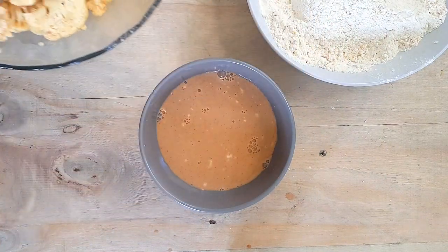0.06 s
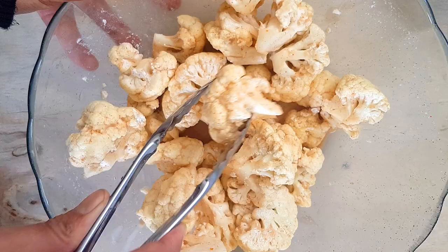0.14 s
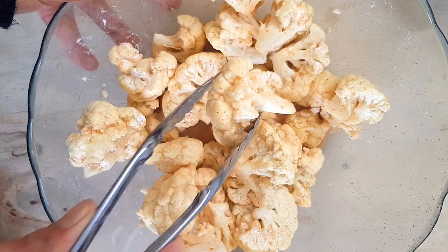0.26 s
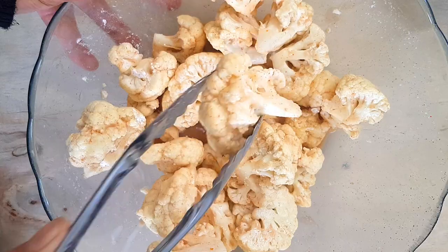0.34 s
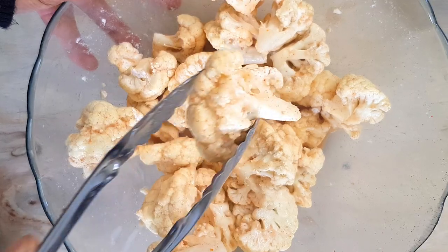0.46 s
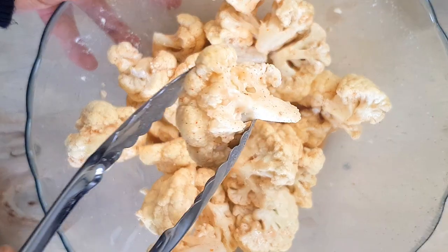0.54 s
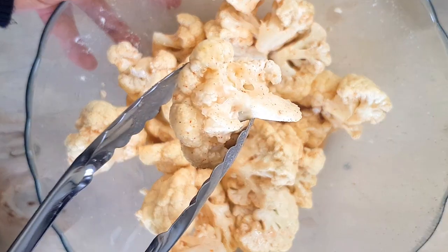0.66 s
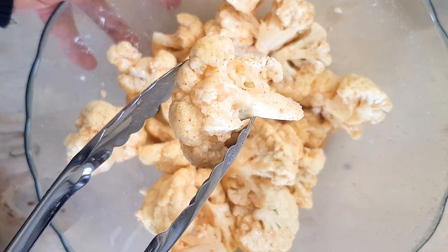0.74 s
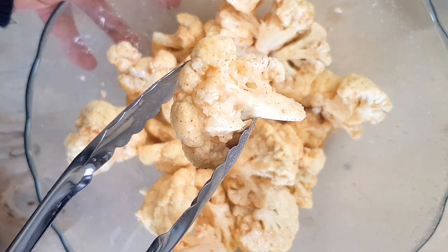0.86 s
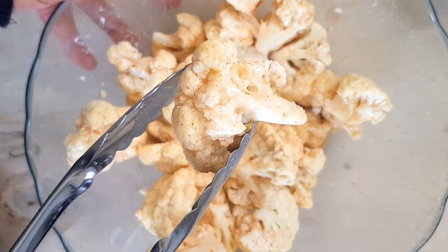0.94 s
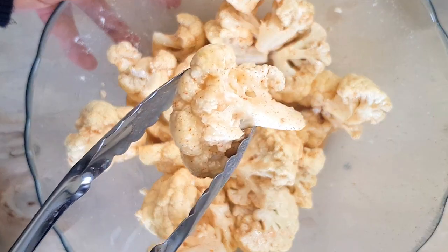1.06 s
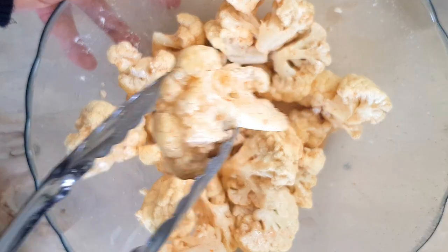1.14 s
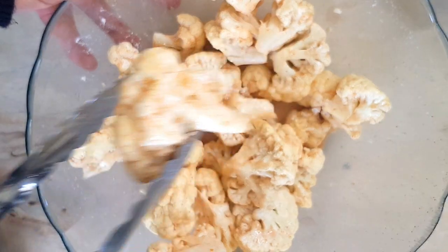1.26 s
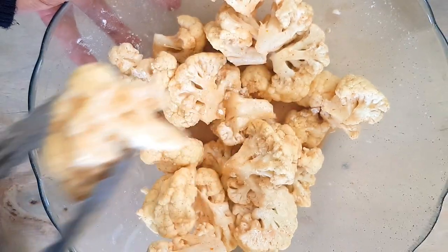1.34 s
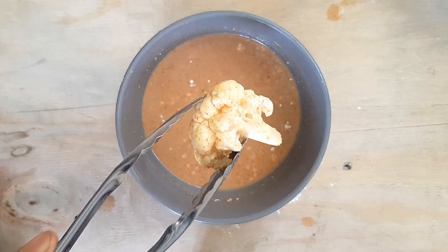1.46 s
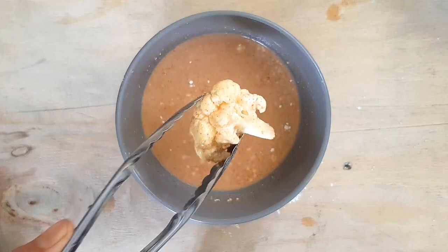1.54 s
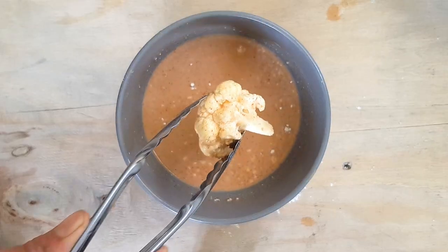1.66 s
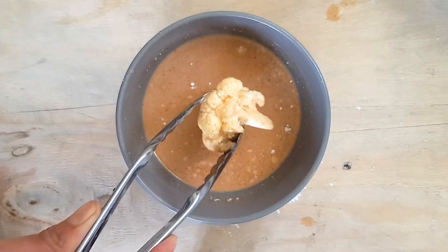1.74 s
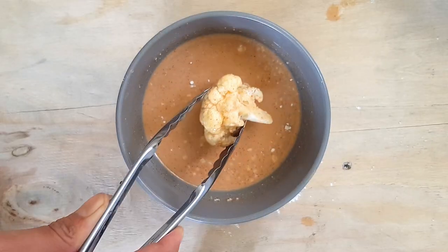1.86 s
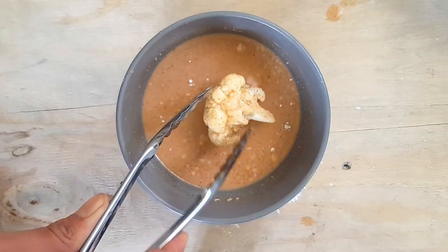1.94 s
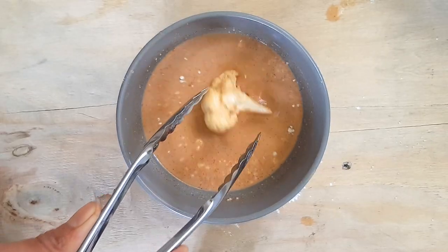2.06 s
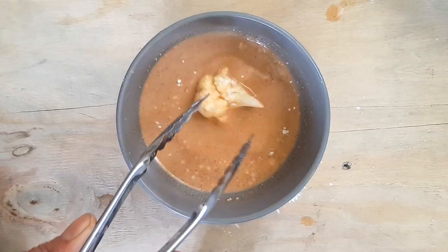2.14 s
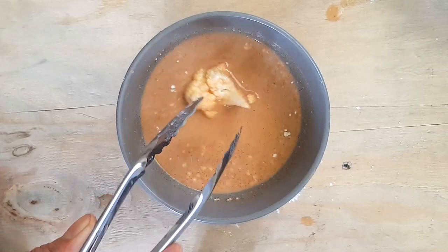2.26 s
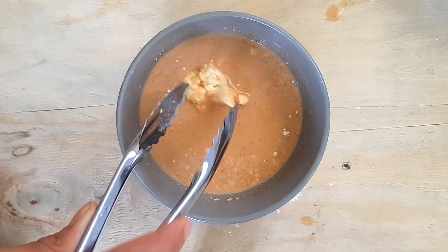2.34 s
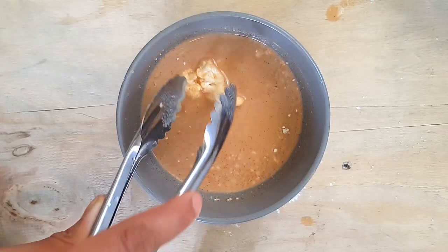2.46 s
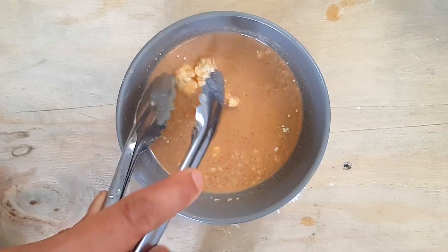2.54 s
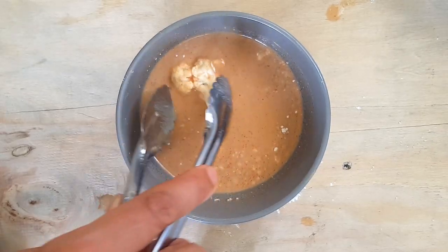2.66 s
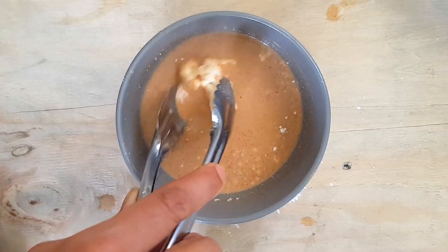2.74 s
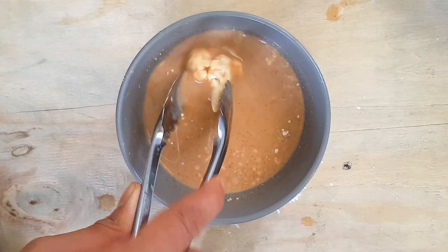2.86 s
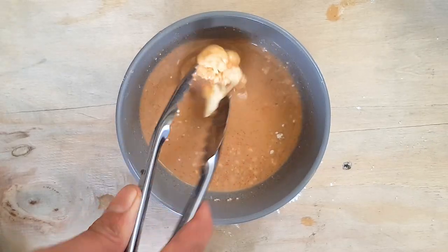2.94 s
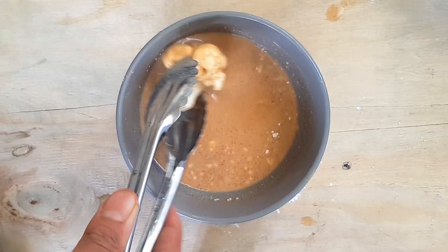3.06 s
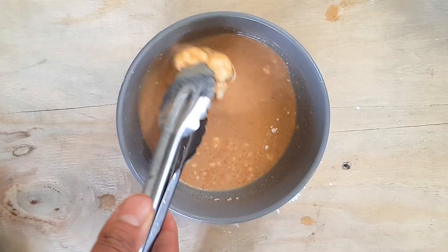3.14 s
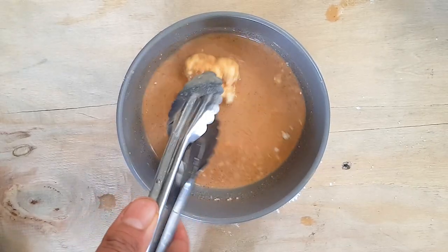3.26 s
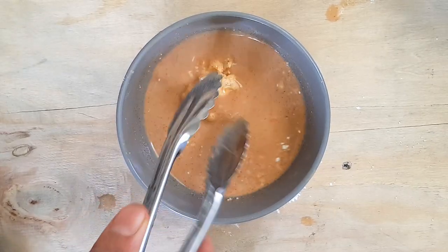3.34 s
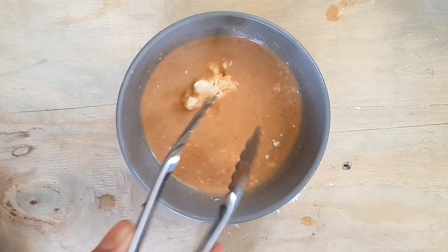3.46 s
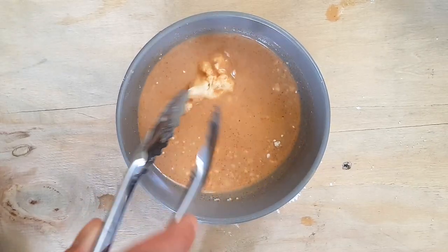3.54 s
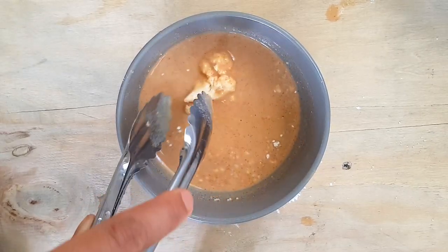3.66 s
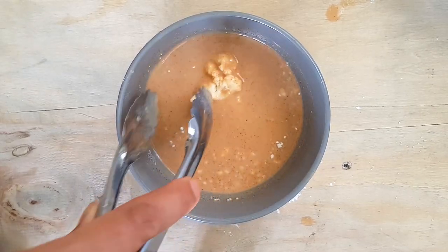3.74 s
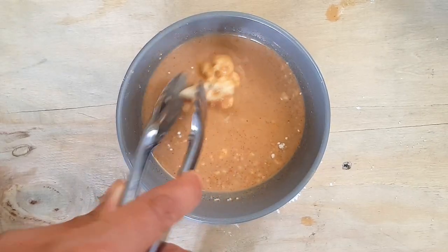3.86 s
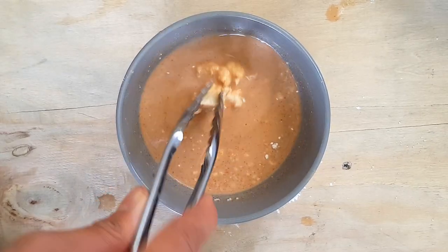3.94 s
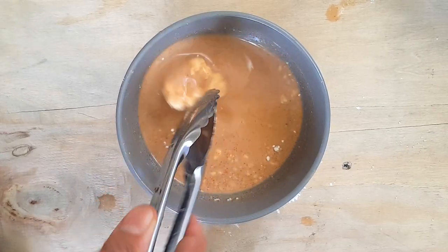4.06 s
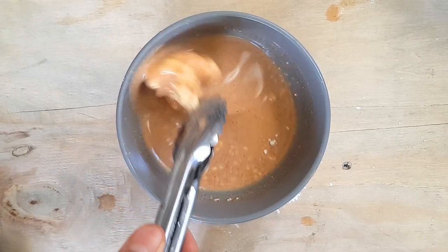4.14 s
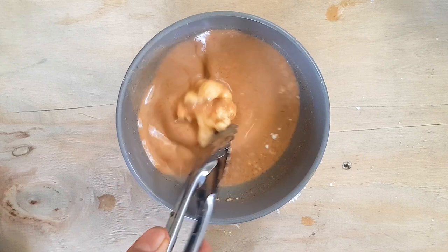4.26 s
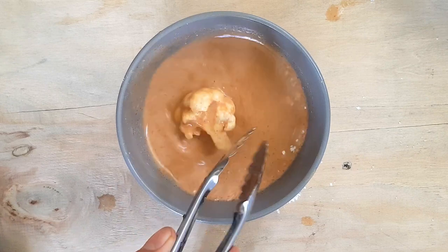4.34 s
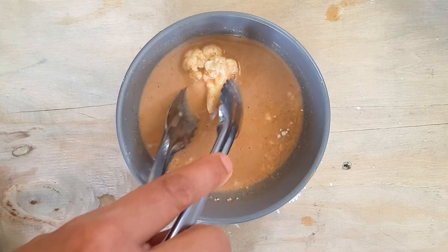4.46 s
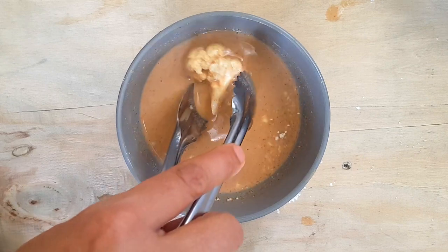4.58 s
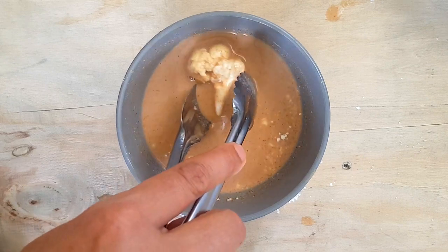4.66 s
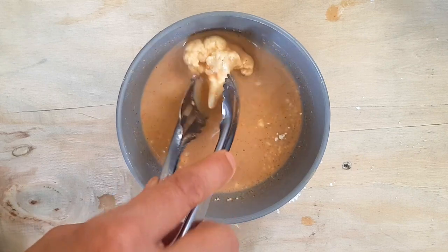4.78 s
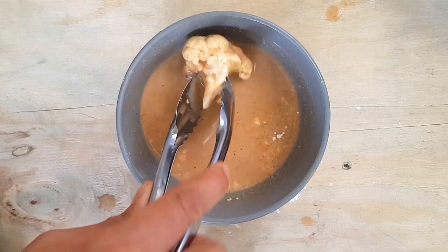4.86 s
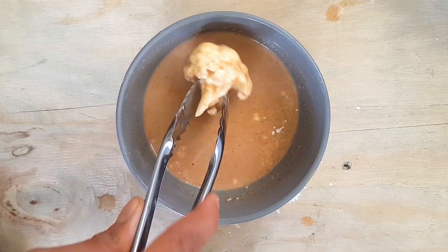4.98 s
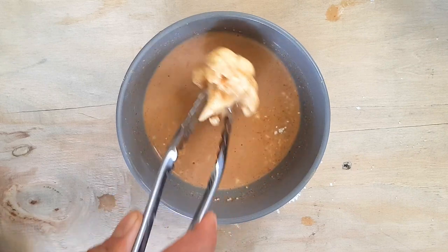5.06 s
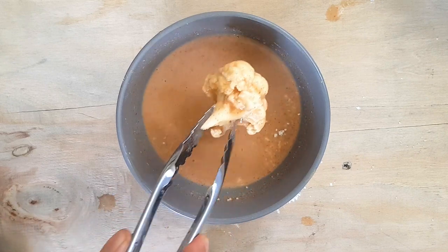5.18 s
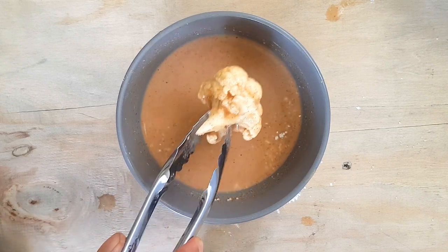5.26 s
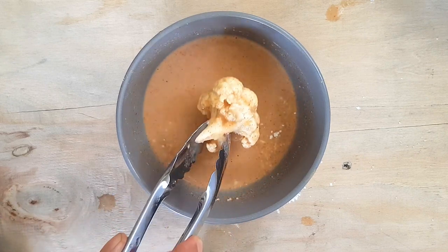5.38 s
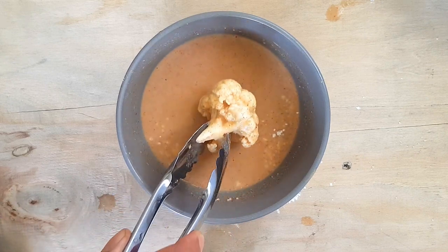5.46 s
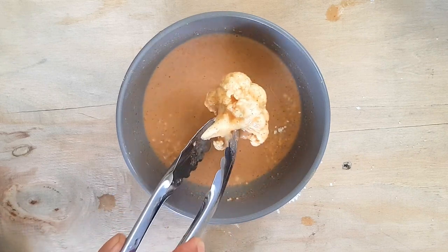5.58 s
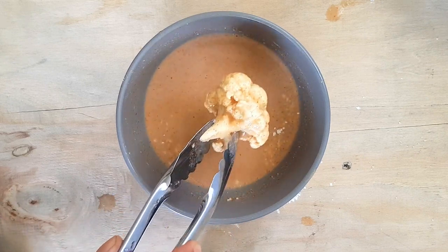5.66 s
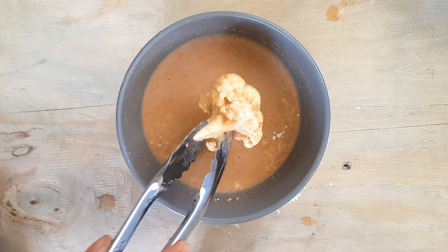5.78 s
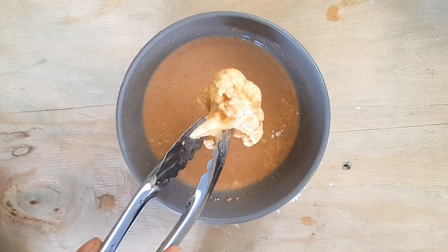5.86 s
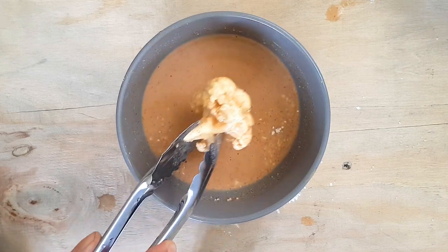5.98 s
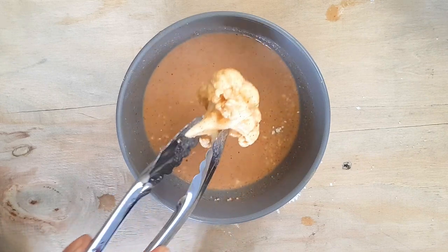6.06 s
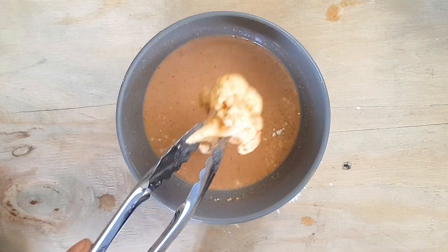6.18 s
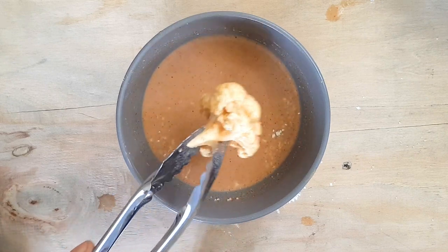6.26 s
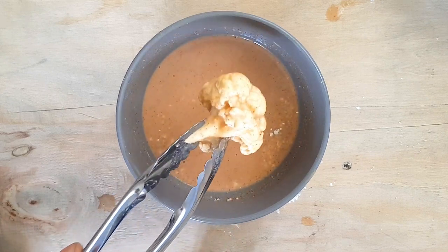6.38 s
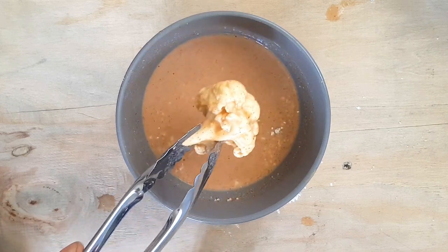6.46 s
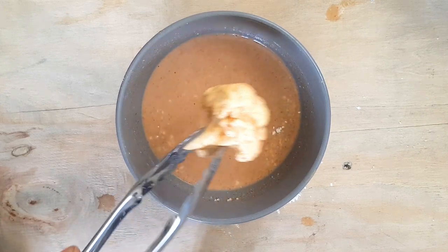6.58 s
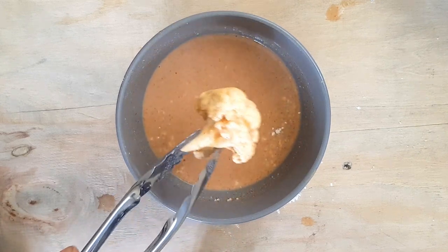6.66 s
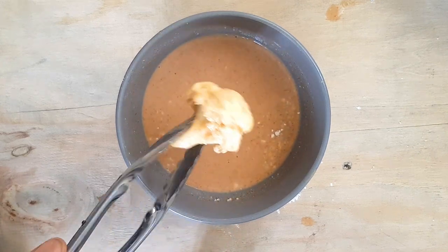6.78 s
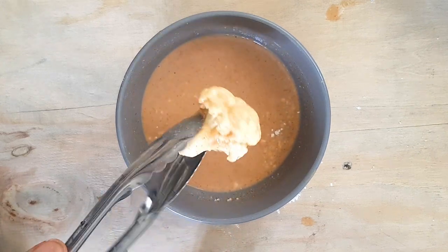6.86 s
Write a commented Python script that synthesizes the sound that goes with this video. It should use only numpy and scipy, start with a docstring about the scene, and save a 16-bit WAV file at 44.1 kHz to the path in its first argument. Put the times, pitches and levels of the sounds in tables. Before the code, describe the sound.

A small, quiet kitchen heard close by a phone: wavering low rumble and wide soft hiss. A far bird gives faint two-note falling whistles near 0.2, 1.8, 3.2 and 5 seconds. For the first two seconds there are only barely audible wet slides and a soft brush around 1.1. At 1.96 steel tongs click sharply, with a dull counter thud at 2.0. Single dry clicks follow at 2.6, 3.3 and 3.7, with sticky squelches and muted batter plops. From 4.15 clicks quicken into the loudest, ringing double clack at 4.27, over soft low bumps. Another cluster comes at 4.68 to 4.75 with a faint bowl ring sagging in pitch, then small clicks around 5.05. Afterwards it is nearly still; a faint throbbing insect trill emerges from 5.3, and at 5.85 the hiss becomes duller and narrow, with a slight batter stir near 6.4.

```python
"""In a small kitchen, steel tongs work a cauliflower floret in a bowl of batter, close to a phone.
Impacts excite the hand-damped arms in short clicks; blows through the bowl ring the wooden counter, and
a struck rim rings the bowl. Snapping films make the squelch, folding batter the plops, rubs the brushing.
Diffuse echoes carry these on. Behind lie rumble and wide hiss, later duller and narrow, a far bird of
stepped whistles and a faint insect of throbbing noise."""
import sys
import numpy as np
from scipy import signal
from scipy.fft import rfft, irfft
from scipy.io import wavfile

SR = 44100
rng = np.random.default_rng(int(sys.argv[2]) if len(sys.argv) > 2 else 0)


def bounce(signal):
    """Save signal as a 16-bit WAV file at the path given by the first command-line argument."""
    frames = np.transpose(np.atleast_2d(signal))
    limited = np.clip(frames, -1, 1)
    pcm = np.round(limited * 32767).astype(np.int16)
    wavfile.write(sys.argv[1], SR, pcm)


N = 305172  # samples

# tongs touching the bowl or each other: t/s, level/dB (before a common trim), body/dB (how freely the
# arms ring), edge/dB (bare steel against padded), chatter peak time/s
CLICKS = [(1.934, -43.5, -10, -3, .0006), (1.9616, -14.5, -6, 7.5, 0.00083), (1.977, -43, 23, 4, .0008),
          (2.0827, -46, -9, -15, 0.00074), (2.6135, -17, -9, 3, 0.00064), (2.7383, -40, 1, -12, 0.00076),
          (2.8, -46, 3, 3, 0.00055), (3.217, -43, 27, 21, 0.00031), (3.273, -24, 2, 1, .001),
          (3.455, -39.5, -9, -11, 0.00076), (3.7238, -13.5, -9, 1.5, .00083), (3.823, -35.5, 1, -5, 0.0013),
          (3.845, -20.5, 0.5, 7, 0.0016), (4.0274, -44, -18, -0.5, 0.00099),
          (4.1475, -34.5, -5, -5, .00076), (4.1635, -25, -4.5, -4, 0.00083),
          (4.1851, -15.5, 2.5, -12, .00063), (4.263, -11, 13.5, -2, 0.0012), (4.269, -4.5, 14.5, 2.5, .001),
          (4.5275, -46.5, -6.5, 0, 0.00066), (4.6772, -18.5, -0.5, -9, 0.00091),
          (4.6858, -17, -1, -2, 0.00043), (4.6954, -27.5, 3, -6, 0.0012), (4.7539, -24, 9, 0, .0013),
          (4.971, -44.5, -22, -4, .0005), (5.032, -35, -16, 4, .0008), (5.0523, -27.5, -2, -2, .00045),
          (5.065, -25.5, 3, -2, 0.00087)]
# modes of the hand-held arms: f/Hz, level/dB, t60/s
ARM_MODES = [(1900, -6, 0.0044), (2350, 2.5, 0.015), (2785, -0.5, 0.0095), (3104, 0, 0.02),
             (4058, -3.5, 0.027), (4420, -7.5, 0.009), (4760, -0.5, 0.016), (5340, -2.5, 0.0097),
             (5890, 1, 0.018), (6660, 1.5, 0.013), (7670, -6, 0.03), (8096, -1.5, 0.0081), (8817, 1, 0.022),
             (9475, 4, 0.023), (10134, 6.5, 0.015), (10870, 3, 0.0059), (11900, 1.5, 0.0078),
             (11900, -0.5, .008), (13700, -2, 0.01)]
# click registers: centres f/Hz; edges f/Hz
REGISTER_HZ = [2200, 5000, 9000, 13300]
REGISTER_EDGES_HZ = [1500, 3300, 7000, 11000, 16000]
# one value per register: its share of an ordinary click level/dB; how far body and edge move it, dB per dB
REGISTER_DB = [-21, -4, 0.5, -8.5]
BODY_SHARE = [1, .2, 0, 0]
EDGE_SHARE = [0, 0, 0, 1]

# blows that reach the counter through the bowl: t/s, peak level/dB, push length/s
THUDS = [(0.834, -49, 0.0024), (2, -28.5, 0.0032), (2.035, -42.5, 0.0074), (2.738, -42.5, 0.0079),
         (3.078, -45, 0.0078), (3.791, -44, 0.0027), (3.837, -33.5, 0.0021), (4.084, -35.5, 0.0096),
         (4.11, -36.5, 0.0078), (4.149, -30, 0.0038), (4.227, -35, 0.0024), (4.274, -38.5, 0.003),
         (4.684, -33.5, 0.001), (4.75, -36, 0.006), (6.619, -44.5, 0.0027)]
# modes of the counter under the bowl: f/Hz, level/dB, t60/s
COUNTER_MODES = [(54, -11.5, 0.33), (83.1, 5.5, 0.12), (111, 1, 0.15), (133, -7.5, 0.036),
                 (162.7, -10.5, 0.097), (198, -12.5, 0.18), (240, -9.5, 0.057), (343, -15, 0.036),
                 (509, -13, 0.087)]

# strikes on the bowl's rim: t/s, peak level/dB
RIM_HITS = [(2.802, -69), (4.678, -51.5), (4.755, -65.5)]
# modes of the bowl: f/Hz, level/dB, t60/s
BOWL_MODES = [(1289, 15, 0.066), (1114, -1, 0.16), (690, -10, .05), (1570, -16, .06), (2150, -5, .06),
              (3420, -10, 0.07)]

# the wet floret slides on the steel: start t/s, length/s, level/dB, edge/dB (bare steel against padded)
SLIDES = [(0, 0.12, -71.5, -4), (.63, 0.048, -72, -13), (0.848, 0.05, -74, -6), (1.038, 0.38, -77.5, -5),
          (1.966, 0.048, -55, -9), (2.42, 0.41, -76.5, 4), (2.678, 0.095, -62, -4),
          (2.793, 0.13, -61, -5.5), (3.036, 0.15, -66, -3), (3.174, 0.19, -64.5, -6),
          (3.748, 0.13, -54.5, -1), (4.02, 0.083, -65.5, 4), (4.158, 0.054, -54, 3),
          (4.252, 0.063, -54.5, -3.5), (4.685, 0.074, -53, -4), (4.828, 0.11, -73, 10),
          (4.972, 0.14, -59, 9), (5.965, .04, -69.5, -6)]
SLIDE_RISE, SLIDE_RELEASE_S = .3, 0.044  # share of a slide spent gathering speed; its dying away
SLIDE_EASE_DB = -4  # change of level over a slide as the floret settles
EDGE_HZ = 9000  # bare steel is heard above this

# the tongs push the floret through the batter: start t/s, length/s, level/dB
STIRS = [(2.72, 0.19, -64.5), (3.05, 0.25, -67.5), (3.78, 0.6, -68.5), (4.66, 0.15, -65.5),
         (6.33, 0.35, -68)]
STIR_RISE, STIR_RELEASE_S = .8, 0.038  # share of a stir spent gathering speed; the batter settling
# every thud jolts the batter: level against the thud, hold, release
SPLASH_DB, SPLASH_S, SPLASH_RELEASE_S = -26, .012, 0.027

# the floret brushing its neighbours or the bowl: t/s, length/s, level/dB
BRUSHES = [(1.031, 0.052, -75), (1.135, 0.15, -69), (1.975, 0.052, -66)]
# room response by register: f/Hz, level/dB, t60/s
ROOM = [(152, -5, 0.36), (990, -13, 0.11), (2502, -21, 0.2), (5000, -17.5, 0.15), (9200, -21.5, .25),
        (13940, -23, 0.21)]
# far bird, two slurred notes a call: t/s, level/dB, high note f/Hz, low note f/Hz
CHIRPS = [(0.236, -70.5, 4270, 3730), (1.753, -67.5, 4105, 3447), (3.23, -69, 4150, 3610),
          (4.977, -68, 4150, 3410)]

# spectra of the still air, before and after the hiss thins out: f/Hz, relative level/dB per Hz
AIR = [(15, -60), (25, -17), (42, 3), (70, 0), (217, -15), (249, -15), (277, -20), (489, -23), (531, -25),
       (575, -26.5), (3520, -39.5), (6380, -32.5), (7710, -36), (14800, -33), (16000, -36)]
LATE_AIR = [(15, -49.5), (25, -13), (80, -2.5), (185, -19.5), (223, -13.5), (531, -33), (575, -28.5),
            (734, -40), (3920, -47), (4740, -38.5), (8360, -39.5), (16000, -56.5)]
AIR_DB, LATE_AIR_DB = -61.5, -61  # rms
HISS_DROP_S = 5.85
# width of the air before the hiss thins out: f/Hz, side minus mid level/dB
AIR_WIDTH = [(60, -17.5), (110, -11.5), (200, -9.5), (380, -10), (700, -3), (1290, -2), (2380, -1.5),
             (4400, -3), (8120, -10.5), (15000, 3.5)]
TOP_HZ = 15900  # nothing is heard much above this


def tongs(trim_db=-11.0, chatter=0.54, crack_db=-5, rattle_db=-43, rattle_s=0.29, knock_db=-34):
    """Impact excitation: steel chatters on steel for milliseconds and rings the damped modes of the arms."""
    out, t = np.zeros(N), seconds(.3)
    lead = 64  # samples of silence, as the colour filter also spreads backwards
    for s, level_db, body_db, edge_db, contact_s in CLICKS:
        # a first touch, then a chatter that swells and dies as the scalloped edge seats itself
        contact = chatter * rng.standard_normal(len(t)) * t / contact_s * np.exp(1 - t / contact_s)
        contact[0] += 1
        # the loose hinge buzzes on faintly
        contact += undb(rattle_db) * rng.laplace(size=len(t)) * decay(t, rattle_s)
        modes = ring(ARM_MODES, t, scatter_db=3.0, detune=0.019)
        arms = signal.fftconvolve(contact, modes)[:len(t)]
        crack = level(band(contact, 2000, 8400), crack_db)
        click = band(level(arms, 0) + crack, 1900, 21000, order=4)

        # a loose grip lets the low modes through; bare steel adds the top that batter would pad away
        colour_db = np.array(REGISTER_DB) + body_db * np.array(BODY_SHARE) + edge_db * np.array(EDGE_SHARE)
        edges = zip(REGISTER_EDGES_HZ, REGISTER_EDGES_HZ[1:])
        registers = [band(click, lo, hi, order=3) for lo, hi in edges]
        gains_db = colour_db - 20 * np.log10(np.std(registers, axis=1))
        click = colour(np.pad(click, (lead, 0)), list(zip(REGISTER_HZ, gains_db)))

        # the bowl's wall answers with a faint, dull knock
        knock = band(np.pad(contact, (lead, 0)), 300, 1400)
        click = level(click, 0) + level(knock, knock_db)
        burst_rms = np.sqrt(np.sum(click ** 2) / (.003 * SR))  # all the energy, as if within 3 ms
        add(out, s - lead / SR, click / burst_rms * undb(level_db + trim_db))
    return out


def thuds():
    """Forced modal response: soft pushes through the batter ring the counter; a longer push is duller."""
    out, t = np.zeros(N), seconds(0.42)
    for s, db, push_s in THUDS:
        push = t * np.exp(-2 * np.pi * t / push_s)
        modes = ring(COUNTER_MODES, t, scatter_db=3.5, detune=0.018)
        thud = band(signal.fftconvolve(push, modes)[:len(t)], 39, 1500)
        add(out, s, thud / np.abs(thud).max() * undb(db))
    return out


def bowl(sag_per_s=0.93, rub_s=0.061):
    """Mass loading: a struck and rubbed rim rings, and its pitch sags as batter washes up the wall."""
    out, t = np.zeros(N), seconds(.4)
    for s, db in RIM_HITS:
        rub = rng.standard_normal(len(t)) * np.exp(-t / rub_s)
        tone = signal.fftconvolve(rub, ring(BOWL_MODES, t, detune=0.0068))[:len(t)]
        # time runs ever slower, so the pitch falls by this fraction each second
        tone = np.interp(t - sag_per_s * t ** 2 / 2, t, tone)
        add(out, s, undb(db) * tone / np.abs(tone).max())
    return out


def squelch(grain_db=2.0, grains_per_s=5000, stick_db=2.0, stick_hz=35, snaps_per_s=35, snap_db=18):
    """Stick-slip: tiny wet films snap as the floret slides on steel; now and then a larger one lets go."""
    happens = rng.random(N) < grains_per_s / SR
    sign = rng.choice([-1, 1], N)
    size = undb(grain_db * np.minimum(rng.exponential(size=N), 5))
    stick = undb(stick_db * level(band(rng.standard_normal(N), 7.5, stick_hz), 0))
    films = happens * sign * size * stick
    films = films + (rng.random(N) < snaps_per_s / SR) * undb(snap_db)
    wet = level(colour(films, [(100, -26.5), (1200, -16.5), (2400, -19.0), (3400, -2.5),
                               (6500, -1), (9500, -1.5), (12500, -8.0), (16000, -21)]), 0)

    soft = signal.sosfiltfilt(signal.butter(3, EDGE_HZ, fs=SR, output="sos"), wet)
    padded = [(s, length, db) for s, length, db, _ in SLIDES]
    bare = [(s, length, db + edge_db) for s, length, db, edge_db in SLIDES]
    shape = SLIDE_RISE, SLIDE_RELEASE_S, SLIDE_EASE_DB
    return soft * strokes(padded, *shape) + (wet - soft) * strokes(bare, *shape)


def slosh(folds_per_s=900):
    """Viscous folding: stirred or jolted, thick batter folds over in many soft, dull plops."""
    folds = (rng.random(N) < folds_per_s / SR) * rng.standard_normal(N)
    plops = colour(folds, [(40, -20.5), (120, 1), (250, 2), (500, -2.5),
                           (800, -13.0), (1250, -20), (2000, -23), (6000, -46.0)])
    jolts = [(s, SPLASH_S, db + SPLASH_DB) for s, db, _ in THUDS]
    stirred = strokes(STIRS, STIR_RISE, STIR_RELEASE_S)
    jolted = strokes(jolts, .3, SPLASH_RELEASE_S)
    return level(plops, 0) * np.hypot(stirred, jolted)


def brushes():
    """Friction noise: short, dull rubs of a floret against another or against the bowl."""
    out = np.zeros(N)
    for s, length, db in BRUSHES:
        n = int(length * SR)
        rub = colour(rng.laplace(size=n), [(300, -25), (1100, -3), (1700, 10.5),
                                           (2500, 2.5), (4000, 1.5), (12000, -24)])
        add(out, s, level(rub * np.hanning(n), db))
    return out


def room(x, gap_s=0.0093):
    """Reverberation: after a short gap, diffuse echoes decay at each register's own rate, bass slowest."""
    t = seconds(0.65)
    hz = np.array(ROOM)[:, 0]
    edges = np.r_[50, np.sqrt(hz[1:] * hz[:-1]), 17000]
    response = 0
    for (_, db, t60), lo, hi in zip(ROOM, edges, edges[1:]):
        fade = decay(t, t60) * (t > gap_s)
        echoes = band(rng.standard_normal(len(t)), lo, hi)
        response = response + undb(db) * echoes * fade / np.linalg.norm(fade)
    return signal.fftconvolve(x, response)[:N]


def bird(echo_t60=0.463, rasp_db=-3, call_s=0.13, direct=0.48):
    """Frequency modulation: a whistle steps from high to low, smeared by partly shared echoes at each ear."""
    out, t = np.zeros((2, N)), seconds(1.0)
    progress = t / call_s
    effort = np.interp(progress, [0, .2, .4, .6, .8, 1], [0.36, 0.8, 0.41, 0.84, 0.44, 0.0086])
    for s, db, high_hz, low_hz in CHIRPS:
        pitch_hz = np.interp(progress, [0, .25, .45, .75, 1], [high_hz, high_hz, low_hz, low_hz, .88 * low_hz])
        rasp = 0.5 + level(band(rng.standard_normal(len(t)), 30, 220), rasp_db)
        whistle = effort * rasp * np.sin(2 * np.pi * np.cumsum(pitch_hz) / SR)
        shared = direct * rng.standard_normal(len(t))
        for ear in out:
            echoes = (shared + rng.standard_normal(len(t))) * decay(t, echo_t60)
            add(ear, s, level(signal.fftconvolve(whistle, echoes)[:len(t)], db))
    return out


def insect(full_db=-83, pulse_hz=9.2, depth=0.55):
    """Amplitude modulation: narrow-band noise throbs as a thin, far trill, heard mostly near the end."""
    t = np.arange(N) / SR
    trill = band(rng.standard_normal(N), 8100, 8650) * (1 - depth * np.cos(2 * np.pi * pulse_hz * t))
    presence = np.interp(t, [5.25, 5.4, 6.5, 6.9], [0.045, 0.69, 0.66, 0.2])  # share of the full level
    return level(trill, full_db) * presence


def air(side_db=0, late_side_db=-19, waver_db=4.0):
    """Shaped noise: rumble wavers under a wide hiss in mid and side; late on it is duller and narrow."""
    t = np.arange(N) / SR
    early = level(colour(rng.standard_normal(N), AIR), AIR_DB)
    late = level(colour(rng.standard_normal(N), LATE_AIR), LATE_AIR_DB)
    apart = level(colour(rng.standard_normal(N), AIR), AIR_DB)
    mid = np.where(t < HISS_DROP_S, early, late)
    waver = np.interp(t, np.linspace(0, t[-1], 60), rng.standard_normal(60))
    mid = mid + band(mid, 30, 400, order=1) * (undb(waver_db * waver) - 1)
    side = colour(apart, AIR_WIDTH) * undb(np.where(t < HISS_DROP_S, side_db, late_side_db))
    return mid + side * np.array([[1], [-1]])


def ring(modes, t, scatter_db=0, detune=0):
    """Modal superposition: decaying sines; contact point and grip change their strength and pitch."""
    hz, db, t60 = np.transpose(modes)[:, :, None]
    strength, pitch = rng.standard_normal((2, len(modes), 1))
    gain = undb(db + scatter_db * strength)
    return np.sum(gain * decay(t, t60) * np.sin(2 * np.pi * hz * (1 + detune * pitch) * t), axis=0)


def strokes(rows, rise, release_s, ease_db=0):
    """Power summation of movements (start/s, length/s, level/dB): each gathers speed, eases, dies away."""
    t, power = np.arange(N) / SR, np.zeros(N)
    for s, length, db in rows:
        progress = np.clip((t - s) / length, 0, 1)
        attack = np.sqrt(np.minimum(progress / rise, 1))
        release = np.exp(-np.clip((t - s - length) / release_s, 0, 20))
        power += (undb(db + ease_db * progress) * attack * release) ** 2
    return np.sqrt(power)


def decay(t, t60):
    """Exponential decay: the level falls 60 dB in t60 seconds."""
    return np.exp(-np.log(1000) * t / t60)


def colour(x, points):
    """Zero-phase filtering: (f/Hz, level/dB) points joined on a log-frequency axis."""
    hz, db = np.transpose(points)
    f = np.fft.rfftfreq(len(x), 1 / SR)
    return irfft(rfft(x) * undb(np.interp(np.log(f + 1), np.log(hz), db)), len(x))


def band(x, lo_hz, hi_hz, order=2):
    """Causal band-pass filtering."""
    sos = signal.butter(order, [lo_hz, min(hi_hz, .45 * SR)], "band", fs=SR, output="sos")
    return signal.sosfilt(sos, x)


def undb(db):
    """Logarithmic level: decibels to amplitude gain."""
    return 10 ** (np.asarray(db) / 20)


def level(x, db):
    """Root mean square: scale a sound to an rms level."""
    return x * undb(db) / np.sqrt(np.mean(x ** 2))


def seconds(length):
    """Sampling: the time axis of a short sound."""
    return np.arange(int(length * SR)) / SR


def add(track, s, sound):
    """Superposition: mix a sound in at a time."""
    i = max(int(s * SR), 0)
    track[i:i + len(sound)] += sound[:max(N - i, 0)]


def scene():
    """Superposition: the work and its echoes lie in the centre; bird and air differ between the ears."""
    near = tongs() + thuds() + bowl() + squelch() + slosh() + brushes()
    return near + room(near) + bird() + insect() + air()


def record(dry, low_cut_hz=38):
    """Band limiting: the phone thins the deepest bass and cuts the top."""
    thinned = signal.sosfilt(signal.butter(2, low_cut_hz, "high", fs=SR, output="sos"), dry)
    return signal.sosfilt(signal.ellip(8, .2, 70, TOP_HZ, fs=SR, output="sos"), thinned)


dry = scene()
out = record(dry)
bounce(out)
```